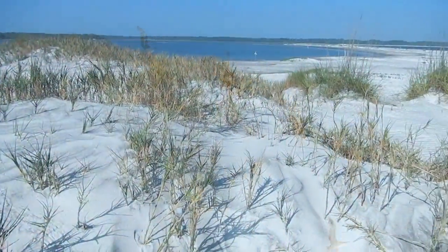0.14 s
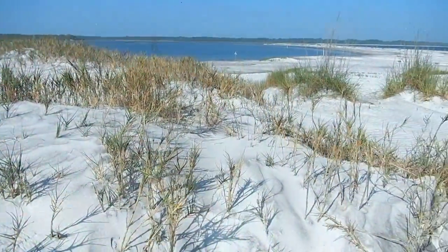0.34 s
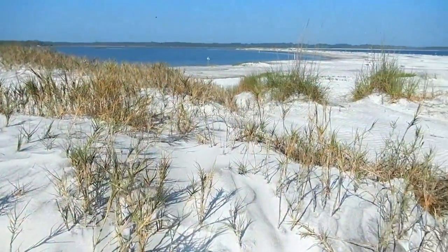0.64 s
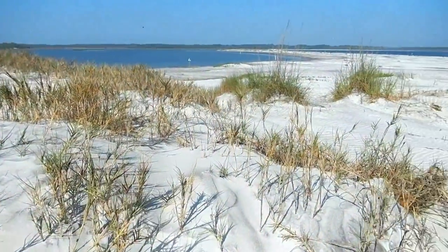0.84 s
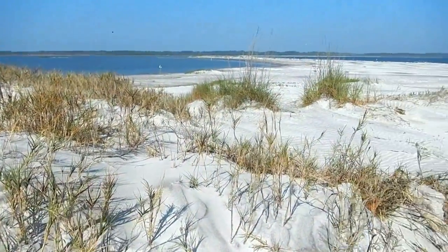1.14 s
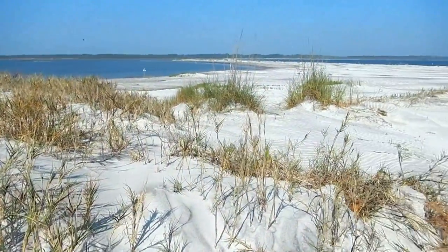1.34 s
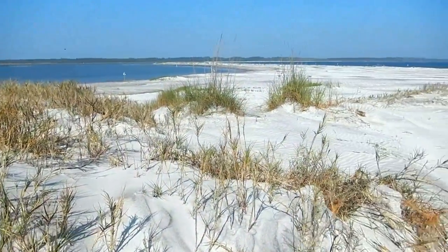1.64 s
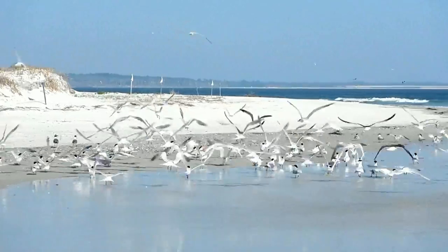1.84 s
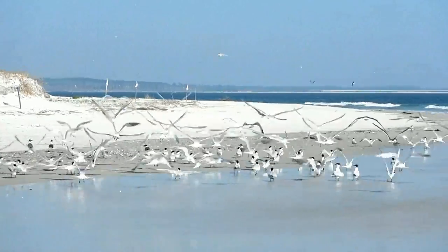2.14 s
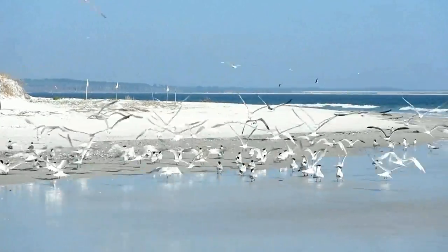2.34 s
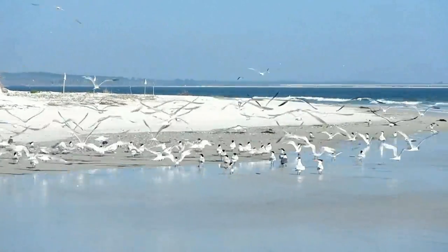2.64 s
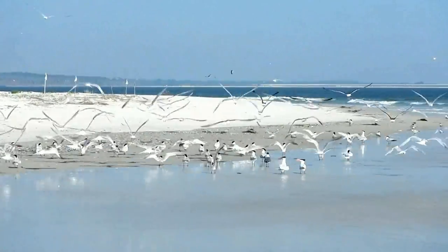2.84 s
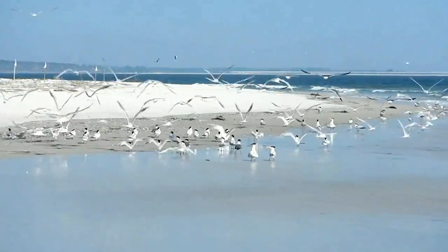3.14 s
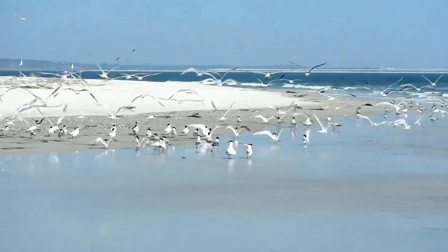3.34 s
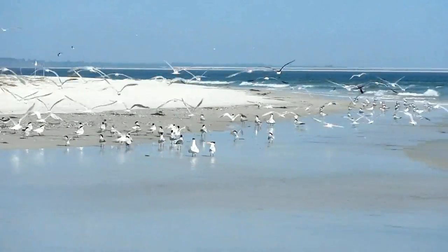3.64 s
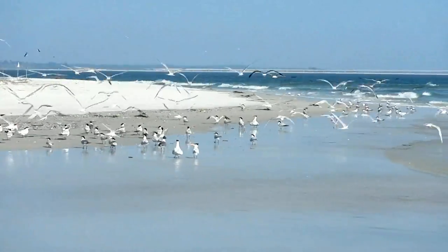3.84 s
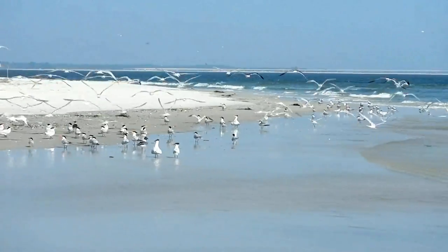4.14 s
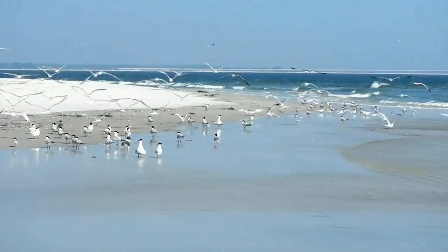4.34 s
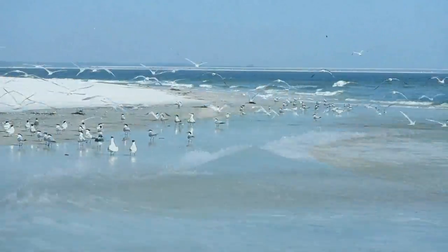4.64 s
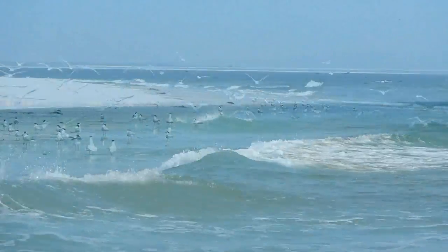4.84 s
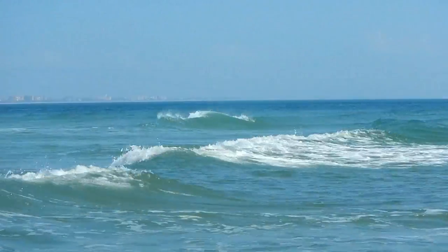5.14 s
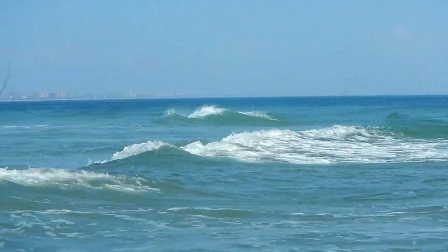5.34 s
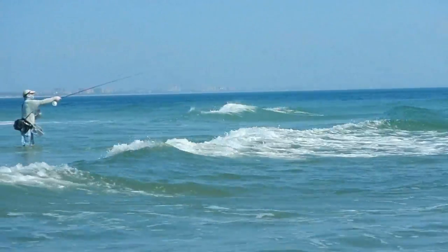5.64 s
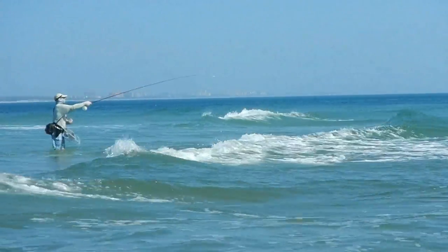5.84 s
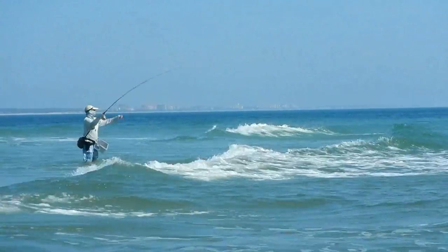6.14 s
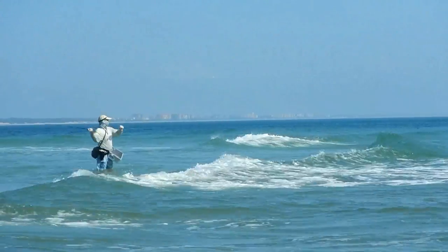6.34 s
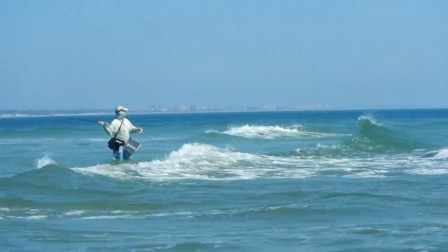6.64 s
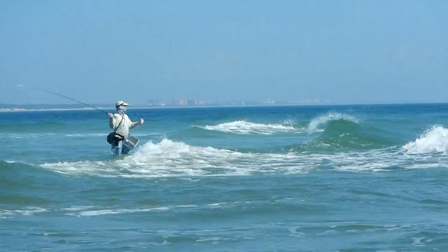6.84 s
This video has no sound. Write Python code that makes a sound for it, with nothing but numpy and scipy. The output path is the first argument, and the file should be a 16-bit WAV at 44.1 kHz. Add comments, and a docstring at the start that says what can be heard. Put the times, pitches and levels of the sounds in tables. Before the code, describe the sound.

A handheld stereo microphone in sea wind picks up low rumbling blasts first, with a few gull cries and tern calls. The wind eases and many near and distant seabirds overlap in quick, nasal, raspy chatter over steady surf. Around five seconds the calls thin out and cease, leaving a low tumbling wave, hissing foam and fresh gusts on the microphone.

```python
"""Gusts thump on two microphone ports in the first second while gulls cry and terns begin to call.
From two to five seconds the flock is thickest: terns roll short notes and one scolds in harsh rasps.
A breaker tumbles from about 4.5 s, the birds stop soon after five, and wind returns past six.
Calls are partials on about 1 kHz through throat and beak, rasps are pulsed noise; sea and gusts are coloured noise.
Surf wash, foam hiss and a faint camera whine last throughout."""
import sys
import numpy as np
from scipy import signal
from scipy.fft import rfft, irfft
from scipy.io import wavfile
from scipy.ndimage import map_coordinates

SR = 44100
rng = np.random.default_rng(int(sys.argv[2]) if len(sys.argv) > 2 else 0)


def unload_wav(signal):
    """Save mono or channel-first audio to the path in sys.argv[1] as 16-bit WAV at rate SR, clipped to [-1, 1]."""
    wavfile.write(
        sys.argv[1],
        SR,
        np.round(np.clip(np.atleast_2d(signal).T, -1, 1) * 32767).astype(np.int16),
    )


N = 308700
TIME_S = np.arange(N) / SR

# All tabled levels are relative; the mix offsets are arguments of the sources. # Arched cries of gulls and
# terns: (start [s], length [s], middle pitch [Hz], glide start to end [share of pitch], # beak resonance [Hz],
# level [dB])
ARCHED_CRIES = [(0.293, 0.1, 1254, -0.038, 3330, -35.5), (.442, 0.095, 932, -0.25, 1800, -27.5),
                (0.591, 0.13, 968, -0.24, 1860, -27.5), (.62, .17, 1107, -.06, 2200, -32.5),
                (0.782, .077, 1054, .18, 2100, -28.5), (1.214, .13, 1225, -.05, 3250, -32),
                (1.352, 0.093, 992, -0.23, 1980, -26), (1.562, .06, 1097, 0.116, 2300, -31),
                (1.719, 0.048, 1047, .1, 3900, -28.5), (1.818, 0.094, 1128, -0.016, 2700, -24.5),
                (1.927, 0.018, 1050, 0.1, 2900, -19.5), (2.554, 0.025, 594, -0.05, 3270, -22.5),
                (2.664, 0.066, 1073, -.07, 2100, -24.5), (2.846, 0.043, 1167, .06, 2200, -20),
                (2.962, 0.078, 1135, 0.11, 2930, -25.5), (3.201, 0.052, 1265, 0.037, 4960, -30),
                (3.365, .073, 1074, 0.004, 3000, -29), (3.446, 0.085, 1280, -.27, 3760, -28),
                (3.643, 0.085, 1215, 0.026, 3280, -24.5), (3.714, 0.085, 1166, -.12, 3130, -27),
                (3.803, 0.06, 1047, -.01, 3960, -27), (3.871, 0.07, 1135, -.04, 2870, -27.5),
                (3.889, 0.11, 996, 0.025, 3900, -26), (4.103, 0.066, 1240, -0.051, 3370, -29),
                (4.529, .11, 1105, -0.026, 3330, -26), (4.732, 0.12, 1254, 0.086, 3650, -31),
                (4.819, 0.1, 1190, -0.17, 3720, -31.5)]
# Tern rolls: (centre of first note [s], notes [count], spacing [s], note length [share of spacing],
# first pitch [Hz], last pitch [Hz], level [dB])
TERN_ROLLS = [(.53, 3, .036, 1, 880, 1007, -33.5), (1.47, 4, 0.05, 0.72, 854, 1068, -31),
              (1.977, 3, 0.034, 0.56, 1048, 915, -13.5), (2.072, 5, 0.029, 0.72, 996, 998, -17.5),
              (2.6, 3, .024, 0.76, 1072, 994, -17), (2.993, 5, 0.027, .8, 1017, 988, -18),
              (3.139, 5, .026, 0.88, 970, 976, -19.5), (3.375, 3, .031, 0.68, 1100, 1102, -19),
              (3.736, 5, 0.035, .66, 1049, 999, -24), (4.202, 3, 0.021, .85, 1003, 985, -24.5),
              (4.276, 4, 0.028, 0.78, 1078, 920, -23), (4.42, 4, 0.037, 0.48, 1020, 1010, -22.5),
              (4.867, 6, 0.024, 0.72, 1108, 892, -26)]
# Single sharp tern calls: (centre [s], length [s], pitch [Hz], level [dB])
TERN_KIPS = [(.67, 0.018, 1060, -23.5), (2.262, 0.033, 1050, -16), (2.815, .011, 1080, -15.5),
             (3.288, 0.022, 1140, -17), (3.332, 0.039, 1040, -17), (4.249, .011, 1016, -18),
             (4.439, .012, 1060, -13.5)]
# Distant crowd: (time [s], level [dB])
CROWD_LEVEL = [(0.0, -38.5), (0.68, -25.5), (0.95, -31.5), (1.36, -27.5), (1.37, -23.5), (1.43, -32),
               (1.78, -27), (1.85, -21.5), (2.27, -14.5), (2.48, -24), (2.53, -31), (2.62, -19),
               (2.66, -20), (3.37, -17.5), (3.6, -28), (3.68, -23.5), (3.92, -18.5), (4.08, -24.5),
               (4.3, -21.5), (4.39, -24), (4.44, -19), (4.46, -18.5), (4.71, -28.5), (4.94, -29),
               (5.2, -35)]
# Far sea: (time [s], wash level [dB], foam level [dB])
SEA_LEVELS = [(0.0, -29, -57), (0.04, -32, -64), (0.62, -29.5, -54.5), (1.71, -29.5, -52),
              (1.89, -27.5, -46), (4.33, -28, -46.5), (4.82, -27.5, -44), (5.11, -25.5, -38),
              (6.84, -31, -45), (7.0, -30.5, -44)]
# Close breaker: (time [s], level [dB])
BREAKER_LEVEL = [(4.4, -63), (4.9, -31.5), (5.4, -28), (6.0, -29), (7.0, -32)]
# Wind on the ports: (time [s], level [dB])
WIND_LEVEL = [(0.0, -18), (0.41, -20.5), (0.45, -13.5), (0.6, -14.5), (0.88, -30), (0.95, -17), (0.99, -13),
              (1.03, -32), (1.97, -33.5), (2.11, -43), (2.14, -33), (2.98, -33.5), (3.12, -26.5),
              (3.18, -39), (3.27, -27.5), (3.35, -35), (3.94, -33), (4.17, -47.5), (5.52, -29),
              (6.34, -34.5), (6.4, -25.5), (6.63, -22.5), (6.69, -27), (6.75, -17.5), (6.78, -24),
              (6.9, -18.5), (7.0, -22.5)]
# Strongest eddies hitting the ports: (centre [s], peak level [dB], thump frequency [Hz])
EDDY_THUMPS = [(.059, -1, 97), (0.148, -4, 129), (.442, 0.5, 171), (.475, -2, 153), (.767, 2.5, 318),
               (.997, -8, 150), (6.405, -3, 128), (6.526, -5, 140), (6.604, 0, 212), (6.759, -4, 170),
               (6.9, -3, 191)]

# Throat resonances of tern note, arched cry and rasp: (frequency [Hz], gain [dB])
TERN_THROAT_GAIN = [(900, -29.5), (1400, -14.5), (1800, 1), (2300, 1.5), (3000, -14.5), (4100, -19),
                    (5300, -19.5), (6400, -39.5), (9000, -50)]
CRY_THROAT_GAIN = [(1000, -17.5), (1400, -10.5), (1750, 3.5), (2300, 0.5), (2900, -10), (3600, -8),
                   (4900, -12.5), (5800, -18), (6800, -33), (9000, -36)]
RASP_THROAT_GAIN = [(900, -38), (1600, -3), (2100, 6.5), (2450, 4.5), (3100, 1), (4200, -14.5), (5500, -25),
                    (7000, -46), (10000, -56)]
# Colour of the distant crowd: (frequency [Hz], gain [dB])
FAR_AIR_GAIN = [(1200, 11), (2000, -1.5), (2800, 2), (4000, -0.5), (5500, -5.5), (7000, -16)]
# Scatter from sand and water: (frequency [Hz], gain [dB])
SCATTER_GAIN = [(1000, -17), (2000, -13.5), (3200, -8), (5000, -1), (8000, 13)]
# Spectra of far wash, foam and breaker: (frequency [Hz], gain [dB])
WASH_GAIN = [(20, -11), (100, -7.5), (250, 0), (430, -1), (720, 2), (1100, -3), (1600, -5), (2200, -12.5),
             (3000, -17), (5000, -22.5), (7000, -34.5), (15000, -56)]
FOAM_GAIN = [(500, -19), (2500, -50), (4000, 1), (5500, 4), (6800, -5), (8500, -1), (10300, 3), (11600, 5),
             (13500, 1), (15700, -8.5)]
TUMBLE_GAIN = [(60, -20), (150, -2), (380, 1.5), (600, -5), (1100, -4), (1900, -16.5), (3000, -45),
               (5000, -53)]
# Stereo width of the water: (frequency [Hz], side minus mid [dB])
SEA_SIDE_GAIN = [(100, -41), (400, -17), (1200, -14), (2500, -4.5), (4500, -3.5), (8000, 6), (11500, 0),
                 (15000, -5.5)]
# Spectra of hard and light wind: (frequency [Hz], gain [dB])
GUST_GAIN = [(15, -43), (40, -9), (80, -2.5), (160, 1.5), (240, -4), (340, -7), (520, -13), (800, -29),
             (2000, -46), (6000, -89)]
BREEZE_GAIN = [(15, -24), (35, -2.5), (70, -0.5), (110, -3), (200, -7.5), (400, -17.5), (2000, -54.5)]

CRY_ARCH = 0.0502  # mean of a cry's end pitches lies this share below its middle
NOTE_SCATTER_DB = 1.2
SCOLD_START_S, SCOLD_SPACING_S, RASP_S = 2.285, 0.041, 0.025
SCOLD_DB, SCOLD_FADE_DB_PER_S = -15, 28
WHINE_HZ, WHINE_RMS_DB = 14836, -58.5
TOP_HZ = 15750


def undb(db):
    """Decibels to amplitude gain."""
    return 10 ** (np.asarray(db) / 20)


def unit(x):
    """Scale to rms 1 over all channels."""
    return x / np.sqrt(np.mean(x ** 2) + 1e-18)


def curves(table):
    """Join each column after the first by straight lines in time."""
    time_s, *columns = np.transpose(table)
    return [np.interp(TIME_S, time_s, column) for column in columns]


def gain_at(hz, spectrum):
    """Amplitude gain of a spectrum, interpolated in dB over log frequency."""
    table_hz, db = np.transpose(spectrum)
    return undb(np.interp(np.log(hz + 1), np.log(table_hz), db))


def colour(x, spectrum):
    """Filter by a spectrum without phase shift."""
    n = x.shape[-1]
    bin_hz = np.arange(n // 2 + 1) * SR / n
    return irfft(rfft(x) * gain_at(bin_hz, spectrum), n)


def walk(rate_hz, size=N):
    """Smooth random curve through normal draws, rate_hz of them a second."""
    steps = np.arange(size) / SR * rate_hz
    draws = rng.standard_normal(int(steps[-1]) + 4)
    return map_coordinates(draws, [steps + 1], order=2)


def add(out, start_s, sound):
    """Mix a sound into out, cut at the end of out."""
    i = max(int(start_s * SR), 0)
    part = sound[..., :max(N - i, 0)]
    out[..., i:i + part.shape[-1]] += part


def swell(u, attack, release):
    """Sine-shaped rise and fall over u = 0..1."""
    ramp = np.minimum(u / attack, (1 - u) / release)
    return np.sin(np.pi / 2 * np.clip(ramp, 0, 1))


def place(sound, spread=0.083):
    """Place a bird at random across the stereo width by opposite level changes."""
    balance = spread * rng.uniform(-0.87, 1)
    return sound * (1 + balance * np.array([[1], [-1]]))


def syrinx(pitch_hz, throat, jitter, shimmer, beak_hz=2000, beak_db=0, waver=0.01097, partial_db=2):
    """An unsteady membrane: eight partials, their strengths varied per call, pass throat and beak."""
    n = len(pitch_hz)
    unsteady_hz = pitch_hz * (1 + jitter * walk(696, size=n) + waver * walk(45.8, size=n))
    phase = 2 * np.pi * np.cumsum(unsteady_hz) / SR
    k = np.arange(1, 9)[:, None]
    resonance_db = beak_db / (1 + ((k * pitch_hz - beak_hz) / 550) ** 2)
    beak = undb(resonance_db + partial_db * rng.standard_normal(k.shape))
    waves = np.sin(k * phase + rng.uniform(0, 2 * np.pi, k.shape))
    partials = gain_at(k * pitch_hz, throat) * beak * waves
    return unit(partials.sum(axis=0) * (1 + shimmer * walk(453.5, size=n)))


def cry(length_s, first_hz, middle_hz, last_hz, beak_hz, jitter=0.015):
    """An arched cry: pitch follows a parabola through three pitches, strength trembles."""
    u = np.linspace(0, 1, int(length_s * SR))
    line_hz = first_hz + (last_hz - first_hz) * u
    arch_hz = (middle_hz - (first_hz + last_hz) / 2) * (1 - (2 * u - 1) ** 2)
    effort = swell(u, attack=0.11, release=0.053) * undb(2.0 * walk(68.4, size=len(u)))
    voice = syrinx(line_hz + arch_hz, CRY_THROAT_GAIN, jitter, shimmer=0.28, beak_hz=beak_hz, beak_db=12)
    return effort * voice


def note(length_s, hz, sag_per_s=4.3, jitter=0.017, open_db=0):
    """A short tern note: pitch drifts linearly, an open beak lifts partials near 4.1 kHz."""
    u = np.linspace(0, 1, int(length_s * SR))
    pitch_hz = hz * (1 - sag_per_s * length_s * (u - .5))
    voice = syrinx(pitch_hz, TERN_THROAT_GAIN, jitter, shimmer=0.22, beak_hz=4100, beak_db=open_db)
    return swell(u, attack=0.2, release=0.32) * voice


def rasp(length_s, pulse_hz=270):
    """The membrane slaps irregularly: decaying noise pulses coloured by the throat."""
    n = int(length_s * SR)
    cycle = np.cumsum(pulse_hz * (1 + 0.15 * walk(300, size=n))) / SR % 1
    slaps = np.exp(-cycle / 1.4) * rng.standard_normal(n)
    voice = unit(colour(slaps, RASP_THROAT_GAIN))
    return swell(np.linspace(0, 1, n), attack=0.13, release=0.24) * voice


def tern_calls(mix_db=-.5, open_db=4):
    """Near terns: single calls and evenly spaced rolls, each note opening the beak differently."""
    out = np.zeros((2, N))
    notes = list(TERN_KIPS)
    for start_s, count, spacing_s, fill, first_hz, last_hz, db in TERN_ROLLS:
        for k, hz in enumerate(np.linspace(first_hz, last_hz, round(count))):
            note_db = db + NOTE_SCATTER_DB * rng.standard_normal()
            notes.append((start_s + k * spacing_s, fill * spacing_s, hz, note_db))
    for centre_s, length_s, hz, db in notes:
        voice = note(length_s, hz, open_db=open_db * rng.random())
        add(out, centre_s - length_s / 2, place(voice) * undb(db + mix_db))
    return out


def tern_scold(count=5):
    """One tern's run of harsh rasps, each set weaker than the last."""
    out = np.zeros((2, N))
    for since_s in np.arange(count) * SCOLD_SPACING_S:
        db = SCOLD_DB - SCOLD_FADE_DB_PER_S * since_s
        add(out, SCOLD_START_S + since_s, place(rasp(RASP_S)) * undb(db))
    return out


def arched_cries(mix_db=-1):
    """Near gulls and terns: arched cries, each with its own glide and beak resonance."""
    out = np.zeros((2, N))
    for start_s, length_s, hz, glide, beak_hz, db in ARCHED_CRIES:
        first_hz = hz * (1 - CRY_ARCH - glide / 2)
        last_hz = hz * (1 - CRY_ARCH + glide / 2)
        voice = cry(length_s, first_hz, hz, last_hz, beak_hz)
        add(out, start_s, place(voice) * undb(db + mix_db))
    return out


def crowd(count=100, roll_s=.031, tern_hz=1070, gull_hz=1130, gull_db=-5, rasp_db=-4, mix_db=-5):
    """Distant birds overlap: each time slot holds a sinking five-note roll, a hoarse cry and a rasp."""
    out = np.zeros((2, N))
    end_s = CROWD_LEVEL[-1][0]
    slots = (np.arange(count) + rng.random(count)) / count
    for start_s in slots * (end_s + .1) - .1:
        pitch, pace, size, gull = rng.uniform(-1, 1, 4)
        for k in range(5):
            hz = tern_hz * (1 + .12 * pitch - 0.02505 * k + .02 * rng.standard_normal())
            voice = note(0.0181, hz, sag_per_s=rng.uniform(-1.2, 6.4), jitter=0.022)
            note_s = start_s + k * roll_s * (1 + .2 * pace)
            add(out, note_s, place(voice, spread=0.14) * undb(0.53 * size))
        hz = gull_hz * (1 + .2 * gull)
        beak_hz = rng.uniform(3000, 4900)
        voice = cry(.06 + 0.0268 * pace, .92 * hz, hz, .88 * hz, beak_hz, jitter=0.023)
        add(out, start_s + .1 * rng.random(), place(voice, spread=0.23) * undb(gull_db))
        add(out, start_s + .06 * rng.random(), place(rasp(0.056), spread=0.25) * undb(rasp_db))
    fade = np.clip((end_s - TIME_S) / 0.17, 0, 1)
    level_db, = curves(CROWD_LEVEL)
    return unit(colour(out, FAR_AIR_GAIN)) * fade * undb(level_db + mix_db)


def beach(birds, t60_s=0.55):
    """Rippled sand and water scatter a brief decaying noise tail, different at each port."""
    t = TIME_S[:SR // 2]
    tail = rng.standard_normal((2, len(t))) * 1000 ** (-t / t60_s)
    tail /= np.sqrt(np.sum(tail ** 2, axis=1, keepdims=True))
    scattered = signal.fftconvolve(birds, tail, axes=1)[:, :N]
    return birds + colour(scattered, SCATTER_GAIN)


def water(spectrum, flicker_db, flicker_hz):
    """Stereo water noise whose overlapping octave bands flicker independently."""
    mid, side = colour(rng.standard_normal((2, N)), spectrum)
    side = colour(side, SEA_SIDE_GAIN)
    bins = rfft(unit(np.array([mid + side, mid - side])))
    octave = np.log2(np.maximum(np.arange(N // 2 + 1) * SR / N, 32))
    out = np.zeros((2, N))
    for k in range(5, 15):
        band = irfft(bins * np.maximum(1 - abs(octave - k), 0), N)
        out += band * undb(flicker_db * walk(flicker_hz))
    return out


def surf(wash_mix_db=2.0, foam_mix_db=5):
    """Far waves wash, foam fizzes high, and a close breaker adds a low tumble."""
    wash_db, foam_db = curves(SEA_LEVELS)
    breaker_db, = curves(BREAKER_LEVEL)
    wash = water(WASH_GAIN, flicker_db=1.26, flicker_hz=20) * undb(wash_db + wash_mix_db)
    foam = water(FOAM_GAIN, flicker_db=1.2, flicker_hz=45) * undb(foam_db + foam_mix_db)
    tumble = water(TUMBLE_GAIN, flicker_db=1.6, flicker_hz=30) * undb(breaker_db)
    return wash + foam + tumble


def wind_rumble(mix_db=2, flutter_db=3.0, across=0.24, brisk_db=-22):
    """Turbulence rumbles on the ports, reaching higher as it blows harder."""
    level_db, = curves(WIND_LEVEL)
    left, right, cross = rng.standard_normal((3, N))
    # Cross flow pushes one port and pulls the other.
    eddies = np.array([left + across * cross, right - across * cross])
    brisk = .5 + .5 * np.tanh((level_db - brisk_db) / 6)
    gust, breeze = unit(colour(eddies, GUST_GAIN)), unit(colour(eddies, BREEZE_GAIN))
    rumble = brisk * gust + (1 - brisk) * breeze
    return rumble * undb(level_db + mix_db + flutter_db * walk(35))


def wind_thumps(mix_db=-7.5):
    """Strong eddies hit the ports: sine bursts in a bell envelope, out of step between ports."""
    out = np.zeros((2, N))
    t = np.arange(-SR // 40, SR // 40) / SR
    for centre_s, db, hz in EDDY_THUMPS:
        phase = rng.uniform(0, 2 * np.pi) + rng.standard_normal((2, 1))
        bell = np.exp(-(t * hz / 0.7) ** 2)
        add(out, centre_s + t[0], undb(db + mix_db) * bell * np.sin(2 * np.pi * hz * t + phase))
    return out


def wind(left_db=-1.0):
    """Rumble and thumps, with opposite level offsets on the two ports."""
    return (wind_rumble() + wind_thumps()) * undb([[left_db], [-left_db]])


def whine():
    """The camera's thin tone: a sine wavering by a few hertz."""
    phase = 2 * np.pi * np.cumsum(WHINE_HZ + 2 * walk(20)) / SR
    return np.sqrt(2) * undb(WHINE_RMS_DB) * np.sin(phase)


def scene():
    """Birds with beach scatter, over surf, wind and whine."""
    birds = tern_calls() + tern_scold() + arched_cries() + crowd()
    return beach(birds) + surf() + wind() + whine()


def record(dry):
    """A 5 ms fade-in gives a click-free start; the sum is clipped at full scale, then low-passed at TOP_HZ."""
    fade_in = np.minimum(TIME_S / .005, 1)
    clipped = np.clip(dry * fade_in, -1, 1)
    low_pass = signal.ellip(14, .1, 90, TOP_HZ, fs=SR, output="sos")
    return signal.sosfilt(low_pass, clipped)


dry = scene()
out = record(dry)
unload_wav(out)
```